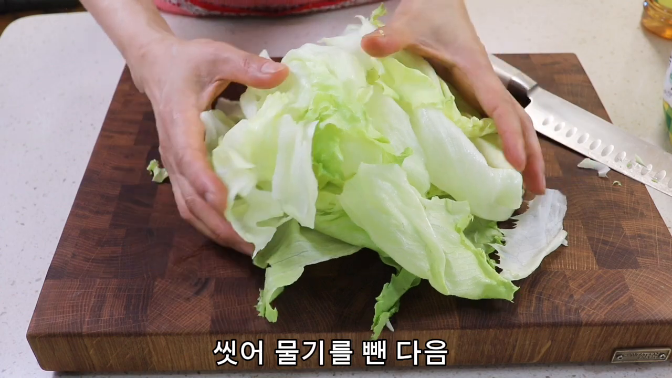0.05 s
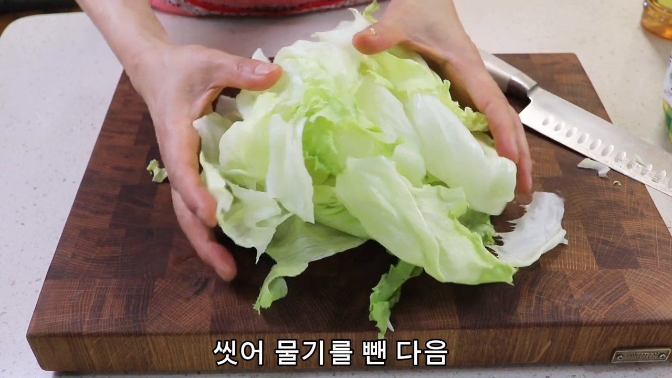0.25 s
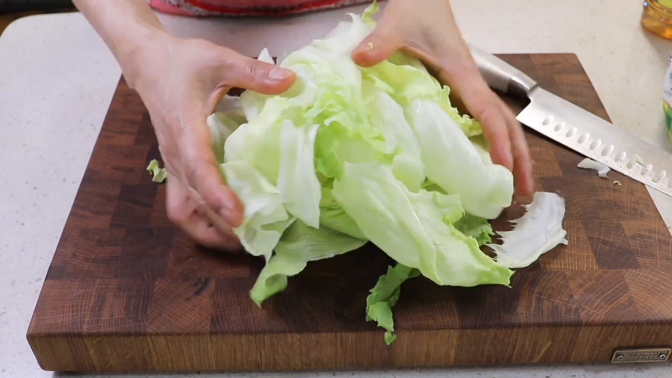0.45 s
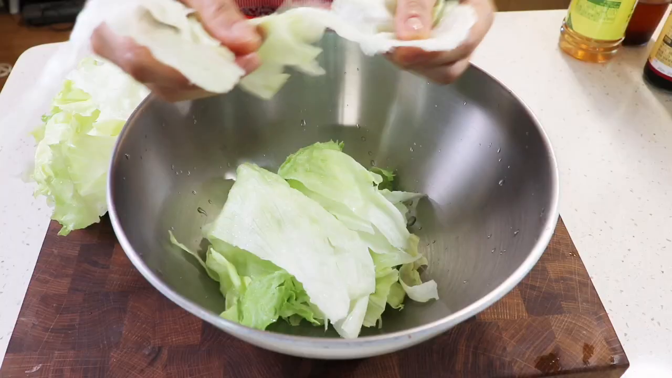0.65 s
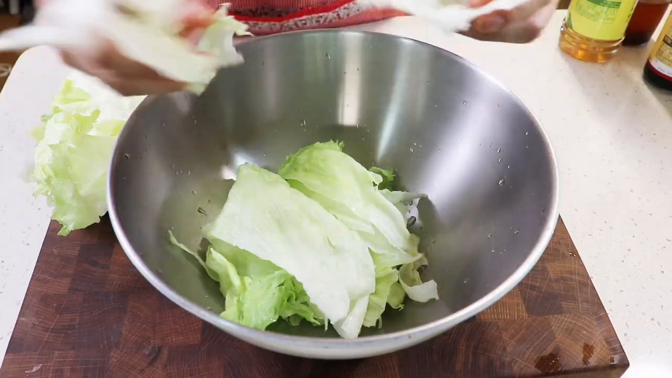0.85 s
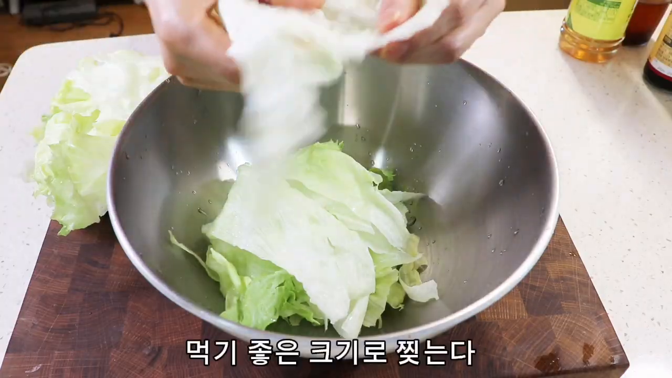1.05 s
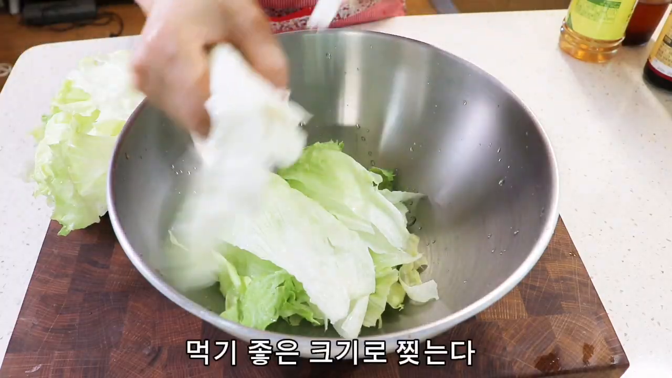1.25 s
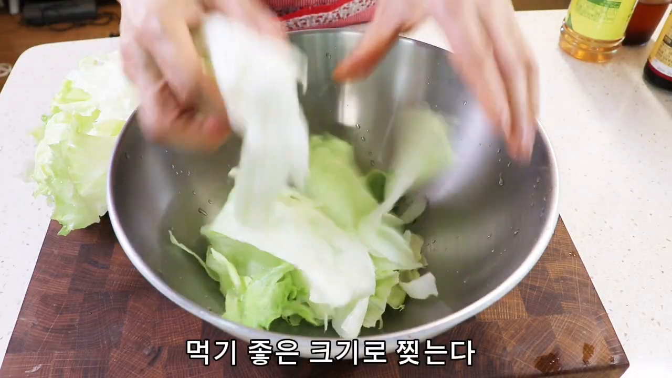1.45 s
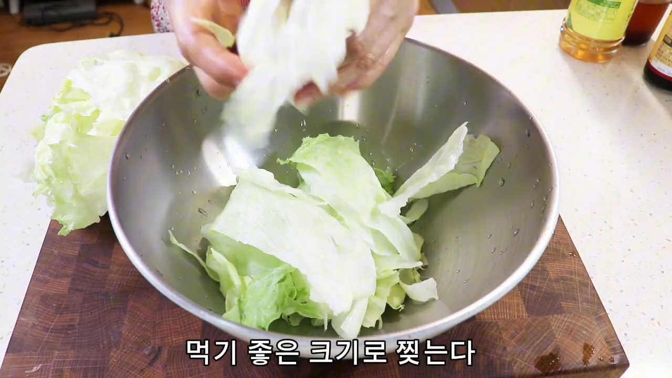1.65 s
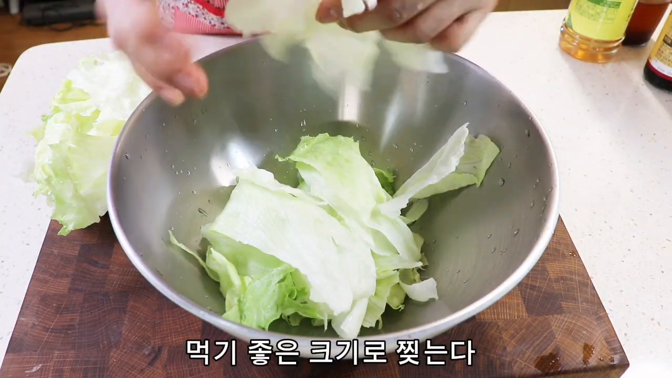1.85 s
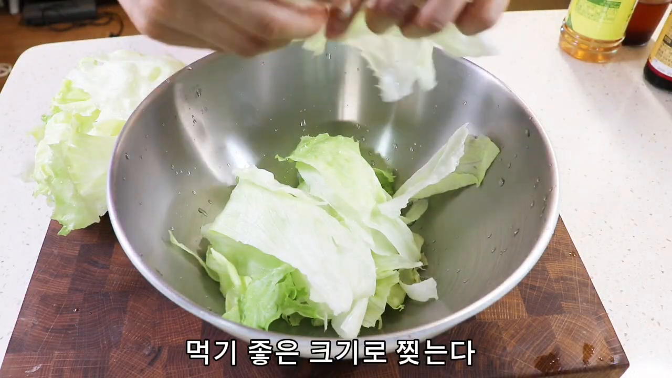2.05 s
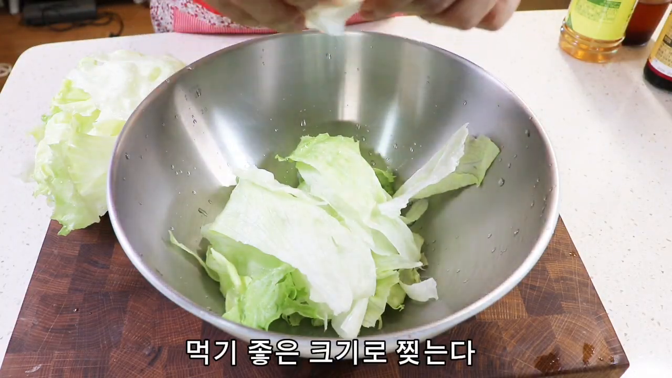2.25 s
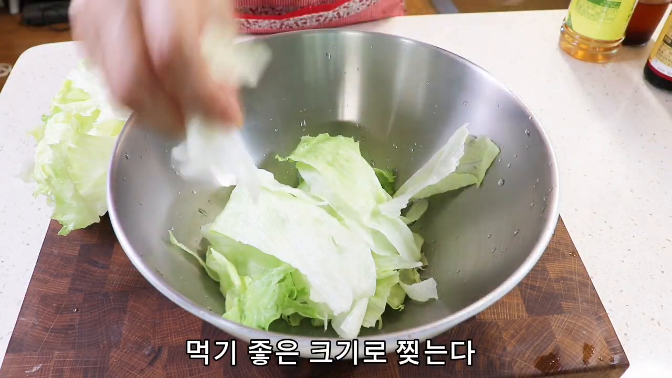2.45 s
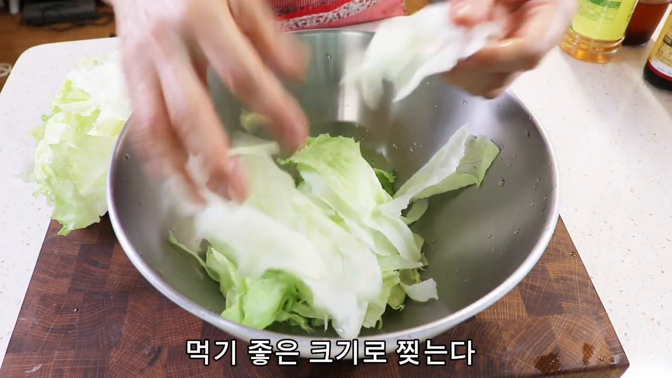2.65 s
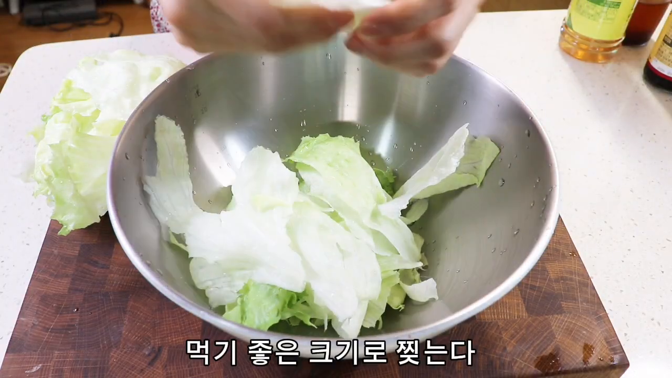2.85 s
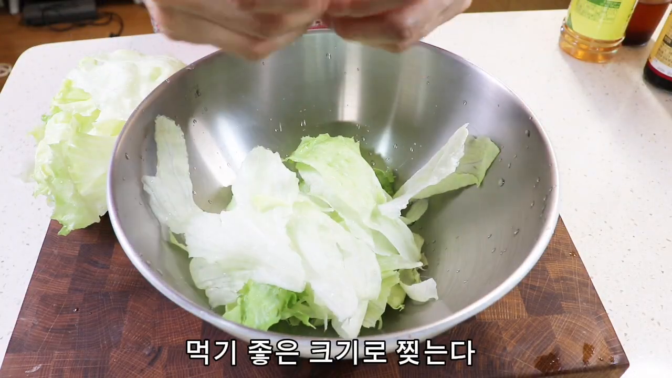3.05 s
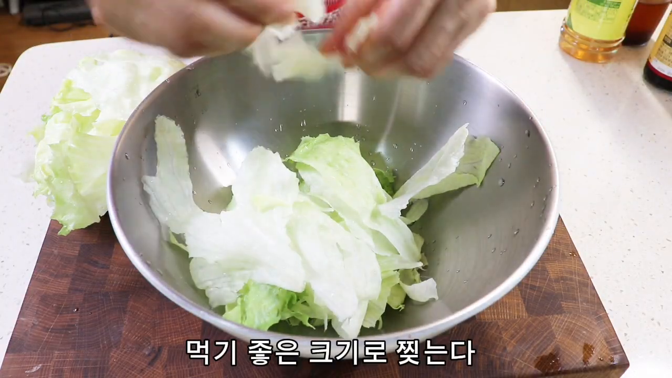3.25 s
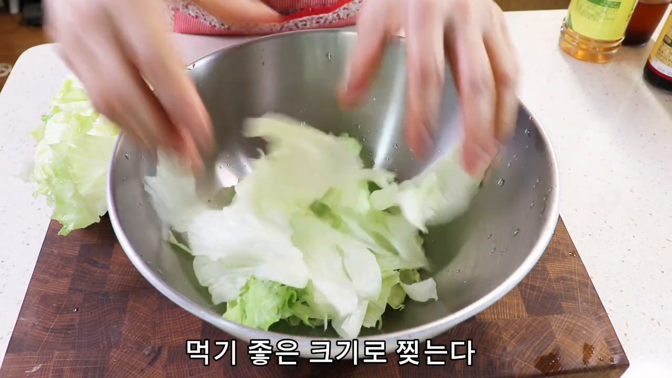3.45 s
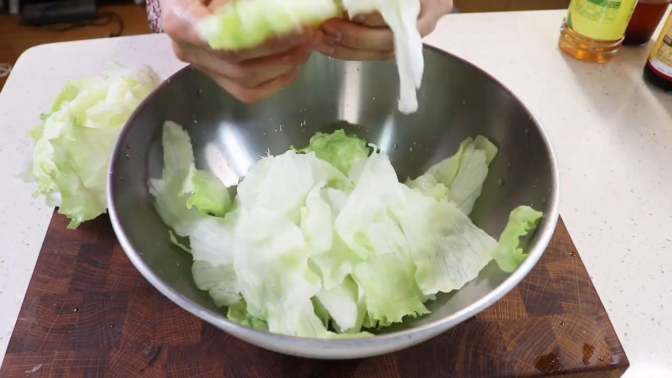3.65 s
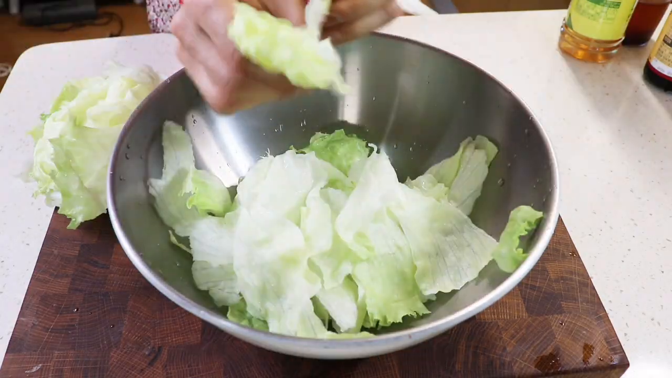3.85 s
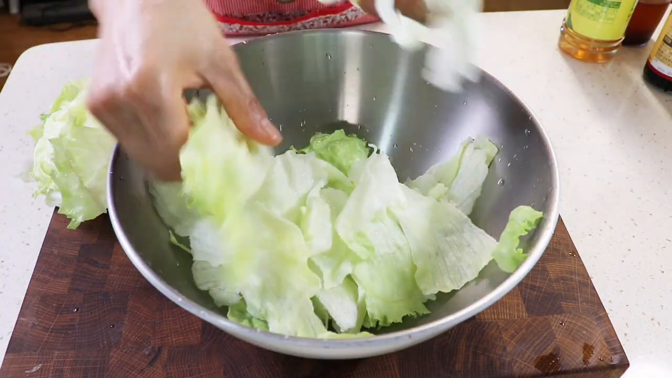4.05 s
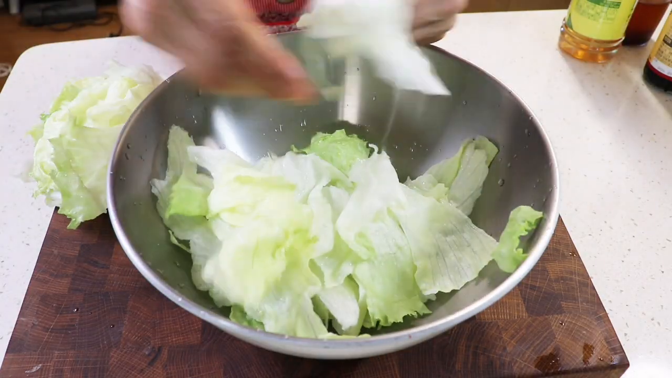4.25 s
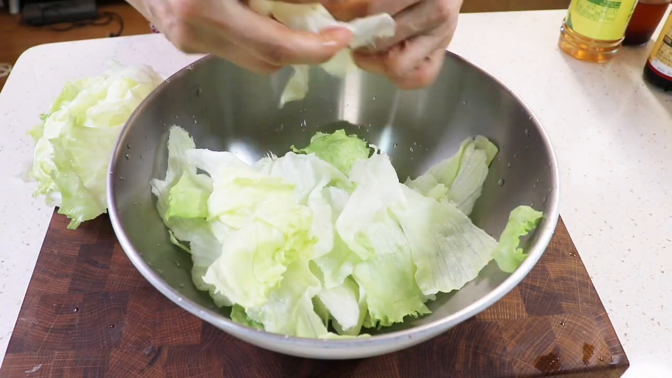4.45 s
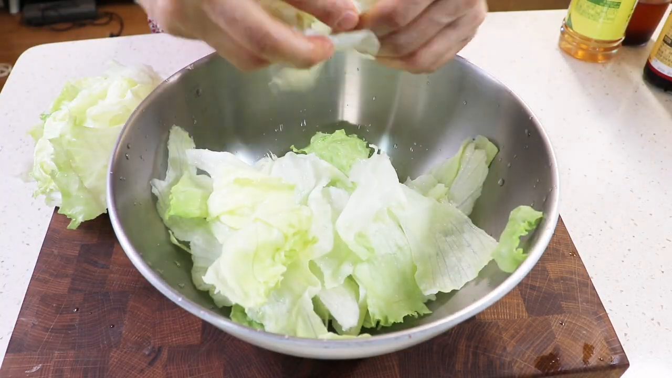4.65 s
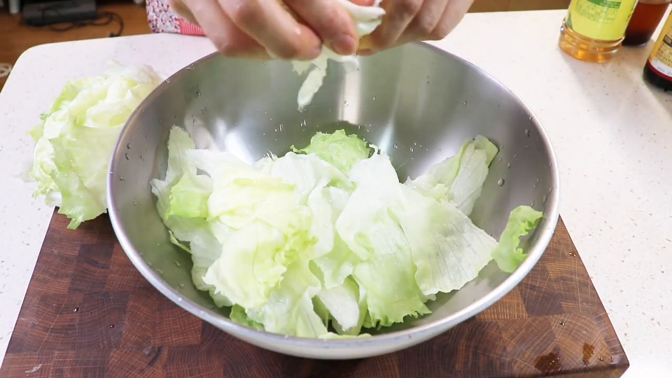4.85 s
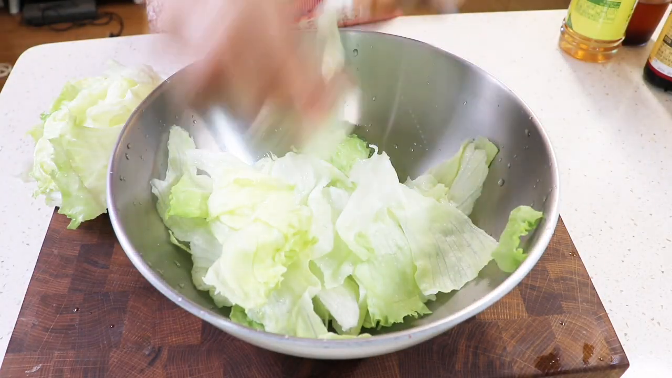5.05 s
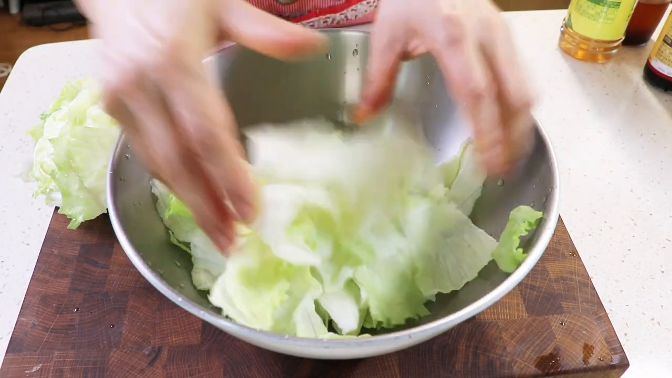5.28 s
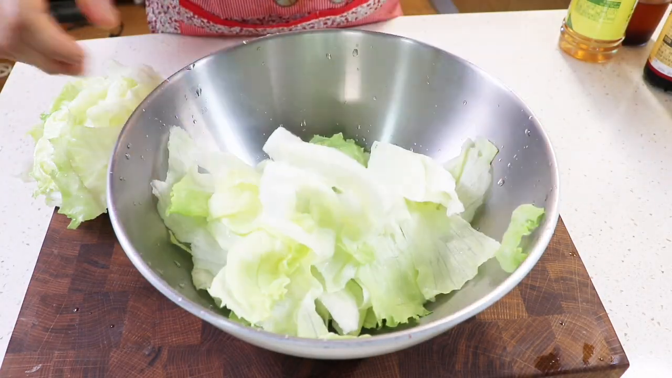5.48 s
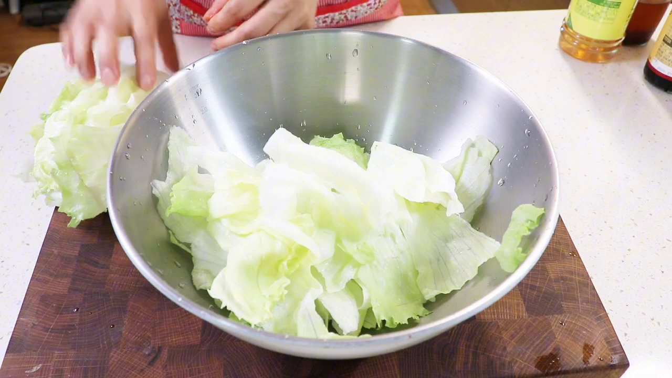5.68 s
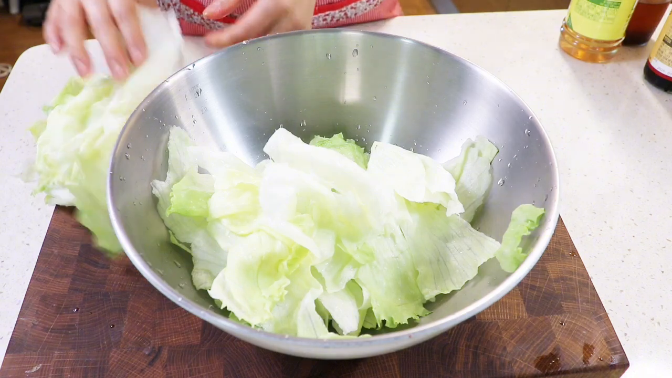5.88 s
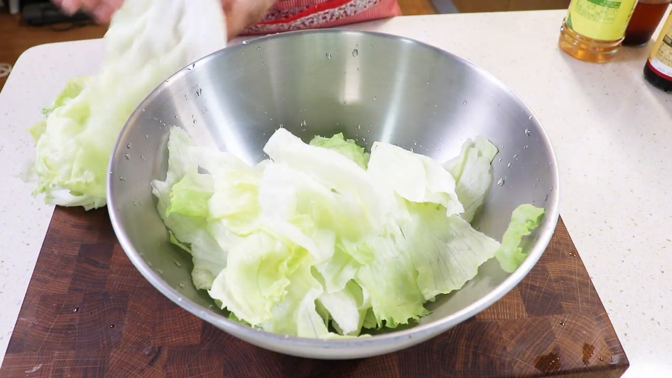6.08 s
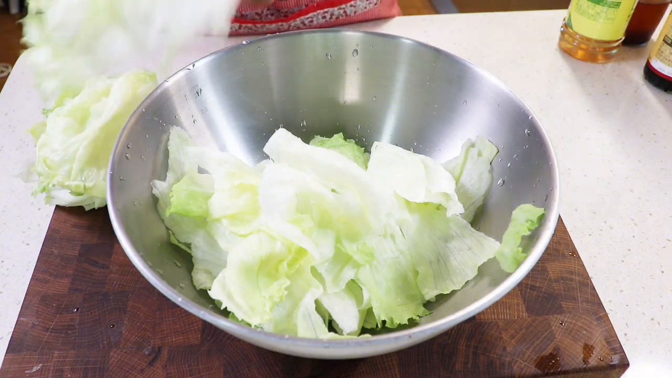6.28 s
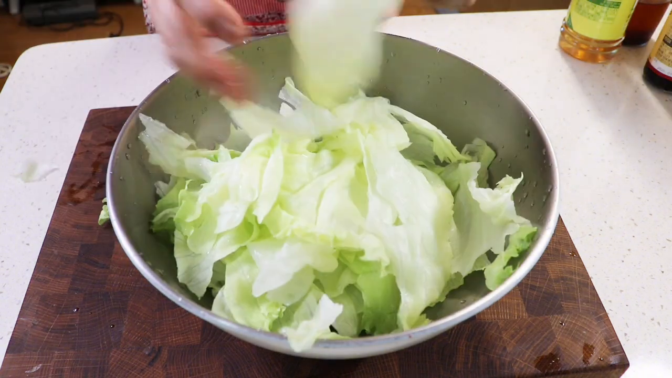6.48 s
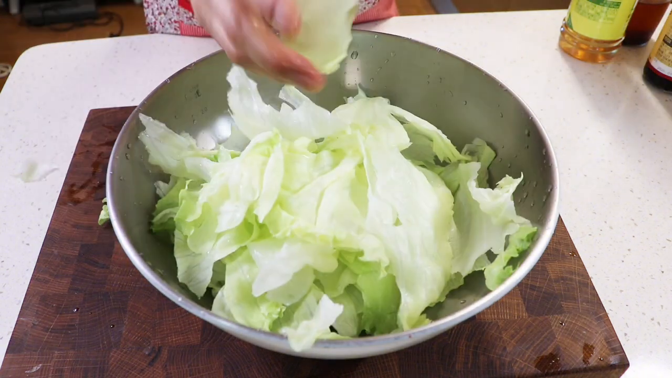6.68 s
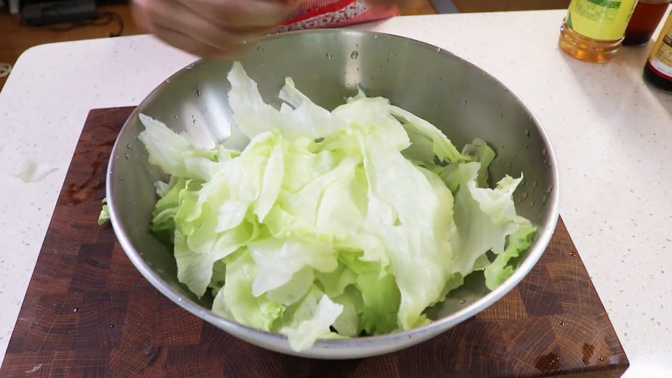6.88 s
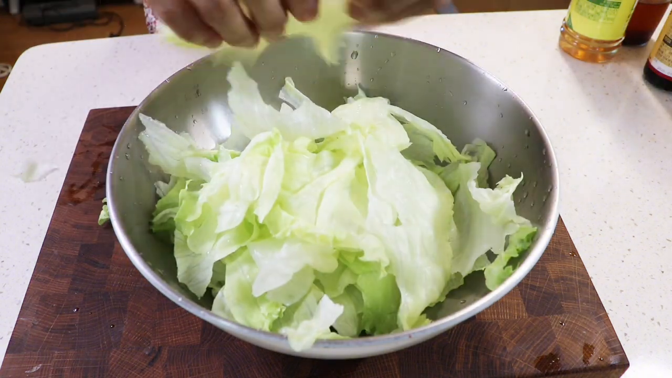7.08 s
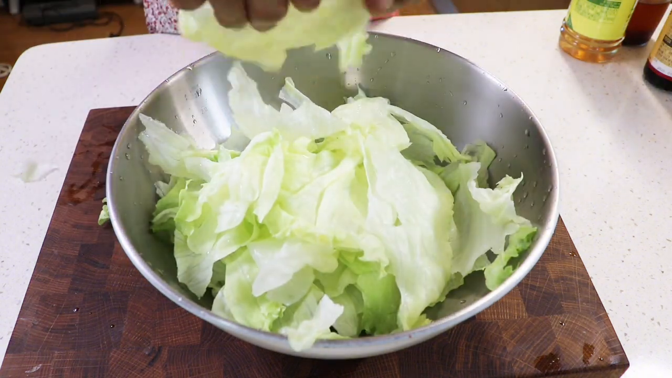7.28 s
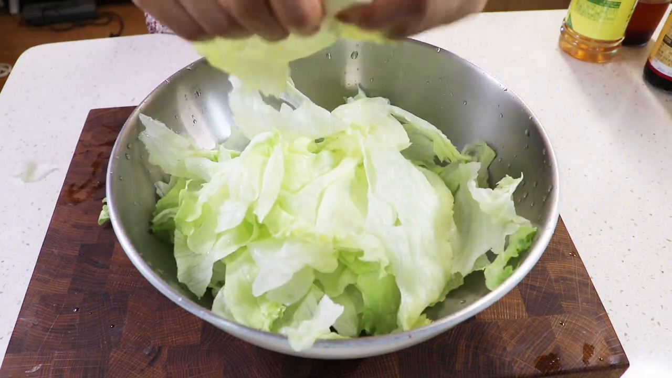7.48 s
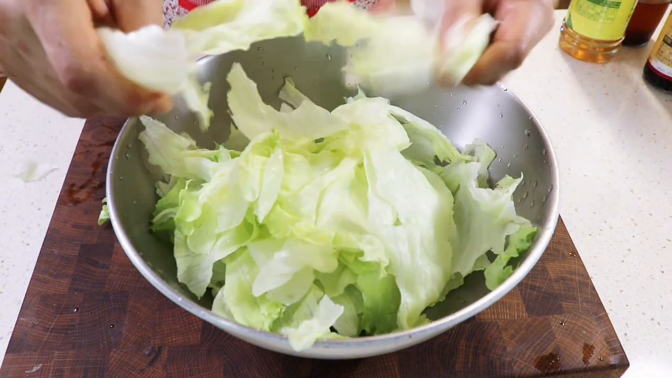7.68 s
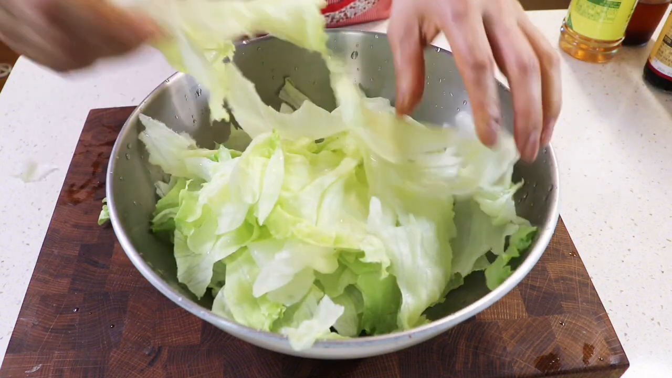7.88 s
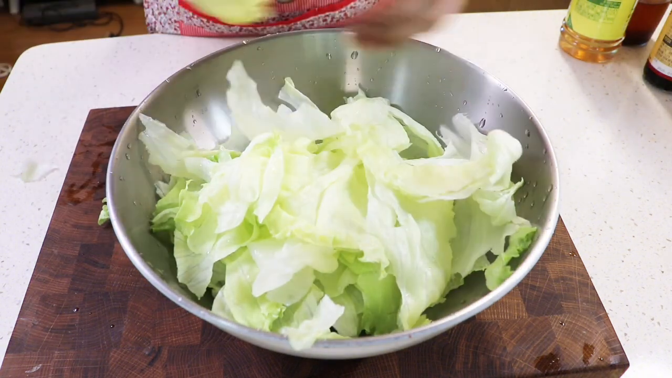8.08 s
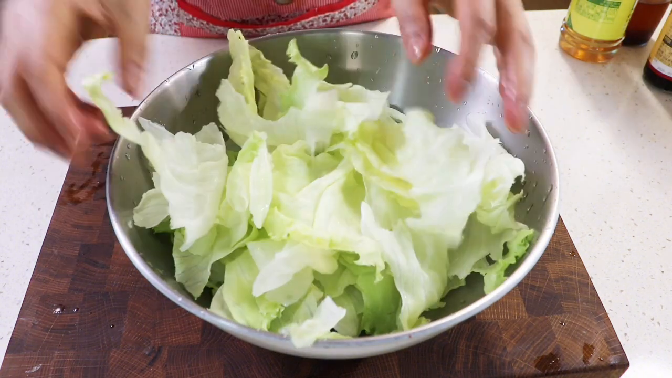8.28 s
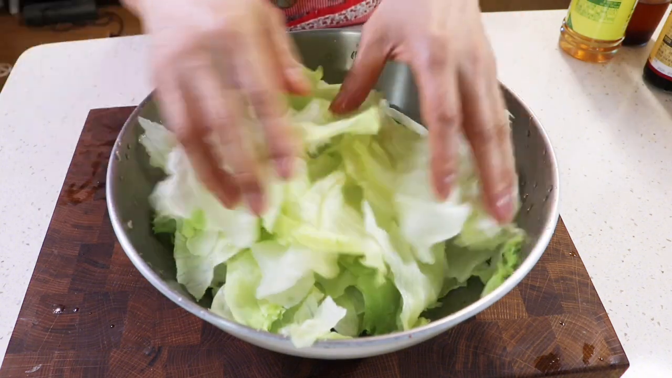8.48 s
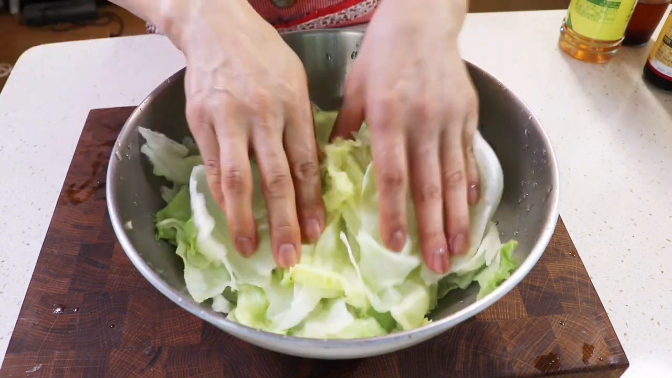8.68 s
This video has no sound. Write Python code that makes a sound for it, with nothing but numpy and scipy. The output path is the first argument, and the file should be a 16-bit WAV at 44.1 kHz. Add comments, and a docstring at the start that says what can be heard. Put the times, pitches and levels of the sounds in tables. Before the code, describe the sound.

Close, crunchy tearing of fresh lettuce in a small kitchen, brittle snaps and rustling leaves in uneven bursts, above faint rumble and hiss.

```python
"""Crisp lettuce torn by hand, close up, over a steel bowl in a small kitchen.
Tearing tissue bursts cell by cell into a dense crackle of short wavelets, and wet leaves rustle as folds give way.
Ribs snap singly, as noise bursts through a resonance; the steel bowl rings once, as a narrow band of noise.
The walls answer briefly, over a low unsteady rumble and the hiss of two microphone channels."""
import sys
import numpy as np
from scipy import signal
from scipy.fft import rfft, irfft, next_fast_len
from scipy.io import wavfile
from scipy.ndimage import uniform_filter1d, map_coordinates

SR = 44100
rng = np.random.default_rng(int(sys.argv[2]) if len(sys.argv) > 2 else 0)


def unload_audio(sound):
    """Save the sound as a 16-bit wav file, at the path given as the first command line argument."""
    columns = np.transpose(np.atleast_2d(sound))
    # keep every value between -1 and 1, then stretch to whole-number steps
    steps = np.round(np.clip(columns, -1, 1) * 32767)
    wavfile.write(sys.argv[1], SR, steps.astype(np.int16))


N = 384993


def amp(db):
    """Decibels to linear gain."""
    return 10 ** (np.asarray(db) / 20)


def unit(x):
    """Scale to an RMS of one."""
    return x / np.sqrt(np.mean(x ** 2) + 1e-20)


def along(points, hz):
    """Read (f/Hz, value) points on a log frequency axis."""
    f, v = np.transpose(points)
    return np.interp(np.log(hz + 1), np.log(f + 1), v)


def curves(rows):
    """One value per sample for each column after the time."""
    s, *cols = np.transpose(rows)
    return [np.interp(np.arange(N) / SR, s, c) for c in cols]


def wobble(rate):
    """A smooth random curve, rate knots a second."""
    knots = rng.standard_normal(int(N * rate / SR) + 4)
    return map_coordinates(knots, [np.arange(N) * rate / SR])


def filtered(x, response):
    """Shape the spectrum of x by a function of frequency."""
    m = next_fast_len(N + SR // 2)
    return irfft(rfft(x, m) * response(np.fft.rfftfreq(m, 1 / SR)), m)[..., :N]


def coloured(x, points, size=2048):
    """x through a causal minimum-phase filter with the given spectrum and unit energy."""
    gain = amp(along(points, np.fft.rfftfreq(size, 1 / SR)))
    cep = irfft(np.log(np.maximum(gain, 1e-4)))
    # fold the cepstrum forward in time, so that no sound precedes its cause
    cep = np.concatenate([cep[:1], 2 * cep[1:size // 2], np.zeros(size // 2)])
    pulse = irfft(np.exp(rfft(cep)))
    return signal.fftconvolve(x, pulse / np.linalg.norm(pulse))[:N]


def band(x, lo_hz, hi_hz):
    """Band-pass x."""
    return signal.sosfilt(signal.butter(2, [lo_hz, hi_hz], "band", fs=SR, output="sos"), x)


def laid(start, rows):
    """Sum short sounds, one a row, at their start samples."""
    at = start[:, None] + np.arange(rows.shape[1])
    return np.bincount(at.ravel(), rows.ravel(), N + rows.shape[1])[:N]


def levelled(x):
    """Even out the slow swings in level, so that the pull alone sets them."""
    return x / np.sqrt(np.abs(uniform_filter1d(x ** 2, size=5000)) + 1e-12)


# One rip of leaf a row: start t/s, hold/s, level/dB, flap/dB and flesh/dB (both against the level)
RIPS = [(0, 0.006, -27, -8.5, -1.5), (0.147, 0.0042, -23.5, -23.5, -6), (0.171, 0.11, -40.5, -2, -3),
        (0.347, 0.019, -40, 0, 6), (0.45, 0.027, -34, -13.5, -1.5), (0.521, 0.17, -39, -2.5, 2),
        (0.638, 0.0047, -22, -15.5, -26.5), (0.903, 0.017, -37.5, -26, -15), (1.121, 0.028, -29, -8, -3.5),
        (1.216, 0.017, -24.5, -6.5, -15), (1.344, 0.064, -41, -23, -7), (1.445, 0.05, -38.5, -1.5, -2.5),
        (1.697, 0.18, -39, -10.5, -14), (1.971, 0, -33, -16.5, -9), (2.112, 0, -26.5, -18.5, -19),
        (2.181, 0.053, -30.5, -16, -6.5), (2.38, 0.024, -26.5, -10, -0.5), (2.639, 0, -40, 8.5, 2),
        (2.803, 0.1, -45, -7, -26), (2.986, 0.012, -38, -11, -30), (3.076, 0, -29, -9, -14),
        (3.194, 0.042, -23, -16, -15.5), (3.445, 0.02, -35.5, -5, -6.5), (3.769, 0.21, -35.5, -17.5, -8),
        (3.841, 0.092, -29.5, -13.5, -2.5), (4.093, 0.051, -36.5, -12.5, -13),
        (4.455, 0.094, -43, -10, -10.5), (4.583, 0.0084, -37.5, -16.5, 1), (4.641, 0.22, -33.5, -18.5, 2),
        (4.816, 0.093, -33, -29, -8), (5.0, 0.053, -28, -21, -13.5), (5.19, 0.032, -38.5, -20.5, -17),
        (5.34, 0.043, -41, -6.5, -12.5), (5.751, 0, -48.5, -7, 5), (5.844, 0.084, -45, -8, -1.5),
        (6.194, 0.12, -44.5, -7, -8), (6.474, 0.12, -45.5, -5, -5), (6.708, 0.045, -47.5, -3, 1),
        (6.848, 0.18, -48.5, 0, 0), (7.12, 0.07, -37.5, -11.5, 3), (7.295, 0.14, -38, -15, 4),
        (7.362, 0.14, -32.5, -12.5, 0), (7.564, 0.02, -21, -9.5, -4), (7.632, 0.17, -44, -19, -10.5),
        (7.909, 0.0077, -42, -8, -10.5), (8.094, 0.0078, -52, 7, 20), (8.164, 0.052, -46.5, -0.5, -20),
        (8.479, 0.008, -32, -11, -20), (8.558, 0.025, -28, -6.5, -17), (8.641, 0.039, -22.5, -8.5, -4.5)]
# Leaves shifting in the hands, beneath the rips: t/s, level/dB
HANDLING = [(0, -38.5), (.7, -51), (2.9, -50), (3.45, -43), (3.665, -67), (3.68, -48), (4.4, -48.5),
            (5.4, -47.5), (5.52, -69), (5.72, -72), (5.95, -50.5), (6.4, -56.5), (7.7, -46), (8.35, -58),
            (8.73, -34.5)]
HANDLING_FLAP_DB, HANDLING_FLESH_DB = -11, -8
RISE_DB_PER_S, FALL_DB_PER_S = 901.5, 318  # a rip builds up fast, holds, and dies away


def pull():
    """Rips and handling add in power; the louder a leaf at each moment, the more it sets the colour."""
    t = np.arange(0, N / SR, 1 / 500)
    s, hold, db, flap_db, flesh_db = np.transpose(RIPS)[:, :, None]
    rise_db = RISE_DB_PER_S * np.maximum(s - t, 0)
    fall_db = FALL_DB_PER_S * np.maximum(t - s - np.abs(hold), 0)
    rips = amp(db - rise_db - fall_db) ** 2
    hands = amp(np.interp(t, *np.transpose(HANDLING))) ** 2
    total = hands + rips.sum(axis=0)

    def blend(rip_db, hands_db):
        return ((rips * rip_db).sum(axis=0) + hands * hands_db) / total

    flap = blend(flap_db, HANDLING_FLAP_DB)
    flesh = blend(flesh_db, HANDLING_FLESH_DB)
    return curves(np.transpose([t, 10 * np.log10(total), flap, flesh]))


def bursts(centre_hz, spread, cycles, spike_db, clump, count):
    """Bursting cells: damped wavelets of scattered pitch and size, arriving in clumps."""
    density = np.cumsum(np.exp(clump * wobble(70)))
    when, pitch, size = rng.random(count), rng.standard_normal(count), rng.exponential(size=count)
    hz = np.clip(centre_hz * np.exp(spread * pitch), 1300, 16000)[:, None]
    t = np.arange(128) / SR
    strength = amp(spike_db * np.minimum(size, 4))[:, None] * np.sqrt(hz)
    wavelets = strength * np.sin(2 * np.pi * hz * t) * np.exp(-t * hz / cycles)
    x = laid(np.searchsorted(density, when * density[-1]).clip(0, N - 1), wavelets)
    # even spectrum, so that the leaf alone sets the colour
    smooth = uniform_filter1d(np.abs(rfft(x)) ** 2, size=4000)
    return levelled(irfft(rfft(x) / np.sqrt(smooth + 1e-9), N))


def creases(t60, spread_db, count):
    """Envelope of folds that give way suddenly and settle within a few hundredths of a second."""
    t = np.arange(2000) / SR
    folds = amp(spread_db * rng.standard_normal((count, 1)) - 60 * t / t60)
    x = .5 + laid(rng.integers(0, N, size=count), folds)
    return x / np.sqrt(np.abs(uniform_filter1d(x ** 2, size=5000)))


def patchy(x, depth_db, size):
    """Random gain in patches of time and frequency: every scrap of leaf has its own colour."""
    z = signal.stft(x, nperseg=size)[2]
    field = uniform_filter1d(rng.standard_normal(z.shape), size=5, axis=0)
    field = uniform_filter1d(field, size=6, axis=1)
    return signal.istft(z * amp(depth_db * unit(field)), nperseg=size)[1][:N]


# Colour of the leaf through the microphone, here and in the snaps: f/Hz, level/dB (per Hz, relative)
LEAF = [(88, -61), (150, -3), (330, -14), (640, -11.5), (900, -11.5), (1810, -6.5), (2070, -4.5),
        (2670, -6), (3790, -3), (4520, -9), (6410, -2), (12400, -16), (15700, -22)]
# Treble at a middling pull, which also shades the snaps: t/s, level/dB
TREBLE = [(.5, -7), (1.2, -8.5), (1.7, -6), (2.4, -4.5), (3, -5), (5, -4), (7.3, -7.5), (8.6, -5.5)]
CRISP_PER_DB = 0.16  # treble gained (dB) for each dB of harder pull


def tearing():
    """The pull drives crackle and rustle; thick or broad leaves sound lower, hard pulls crisper."""
    pull_db, flap_db, flesh_db = pull()
    cells = bursts(centre_hz=3720, spread=0.674, cycles=1.5, spike_db=2.0, clump=1.3, count=9000)
    scraps = patchy(rng.standard_normal(N), depth_db=2.0, size=256)
    scraps = patchy(scraps, depth_db=3.5, size=1024)
    rustle = creases(t60=0.1, spread_db=-2.5, count=500) * scraps
    skin = coloured(cells + amp(1.5) * unit(rustle), LEAF)

    def part(db, lo_hz, hi_hz):
        return amp(db) * unit(band(skin, lo_hz, hi_hz))

    treble_db = curves(TREBLE)[0] + CRISP_PER_DB * (pull_db + 33.5)
    # neighbouring bands alternate in sign to join without a gap
    low = part(flap_db, 365, 1230) - part(flesh_db, 1360, 2980)
    high = part(0, 3190, 5210) - part(treble_db, 8330, 16700)
    return amp(pull_db) * (low + high)


# Background level, changing slowly but for a sudden step down at 3.67 s: t/s, level/dB (relative)
ROOM = [(0, -64.5), (3.66, -64), (3.68, -73.5), (6.9, -68.5), (7.6, -70), (8.73, -64.5)]
# Spectrum of the rumble: f/Hz, level/dB (per Hz, relative)
RUMBLE = [(12, -28), (20, -8.5), (125, -8), (1200, -19), (1560, -23), (2640, -120)]
# Spectrum of the hiss: f/Hz, level/dB (per Hz, relative)
HISS = [(180, -41.5), (300, -5.5), (956, -3.5), (4170, -3), (15700, -13)]


def background():
    """A nearly shared, unsteady rumble, and a partly shared hiss that follows the same room level."""
    room_db, = curves(ROOM)

    def shaded_noise(points):
        return filtered(rng.standard_normal((2, N)), lambda hz: amp(along(points, hz)))

    mid, side = shaded_noise(RUMBLE)
    rumble = unit(np.array([mid + side / 6, mid - side / 6]))
    shared, own = shaded_noise(HISS)
    hiss = unit(np.array([shared + .5 * own, shared - .5 * own]))
    rumble_db = room_db + 10.0 + 2.3 * wobble(7.6)
    hiss_db = 1.59 * (room_db + 70.5) - 67.5  # 1.59 dB for each dB of room level
    return amp(rumble_db) * rumble + amp(hiss_db) * hiss


# Decay of the walls' answer: f/Hz, t60/s
WALLS = [(300, 0.086), (14000, 0.16)]


def kitchen(x):
    """The walls answer with a noise tail in which each frequency dies at its own speed."""
    hz, t, z = signal.stft(rng.standard_normal(SR // 2), SR, nperseg=256)
    decay = amp(-60 * t / along(WALLS, hz)[:, None])
    tail = signal.istft(z * decay, SR, nperseg=256)[1]
    delayed = np.pad(x, (150, 0))  # samples before the first reflection
    return signal.fftconvolve(delayed, tail / np.linalg.norm(tail))[:N]


# One snapping rib a row, except the row at 1.53 s, the click of a fingernail on the steel bowl: t/s, level/dB
# (relative), pitch f/Hz
SNAPS = [(0.0145, -9, 3800), (0.034, -11, 3800), (0.1461, -0.5, 3950), (0.1641, -11, 3870),
         (0.1827, -7.5, 3790), (0.249, -15, 3670), (0.3059, -6, 3730), (0.4219, -24, 7500),
         (0.4478, -18, 3900), (0.631, -13, 3730), (0.7188, -5, 4840), (0.9505, -14, 3620),
         (1.0285, -18, 3600), (1.144, -9.5, 3850), (1.2151, -2.5, 3580), (1.2239, -1.5, 3690),
         (1.2467, -4.5, 3900), (1.5294, -5, 6230), (1.858, -11.5, 3840), (1.973, -12, 3830),
         (2.1061, -25, 7000), (2.119, -3.5, 3960), (2.1294, -6, 3330), (2.139, -1, 3760), (2.166, -6, 4400),
         (2.1814, -4, 3830), (2.186, -1.5, 3950), (2.3302, -27, 7500), (2.3436, -11.5, 5660),
         (2.382, -3, 3860), (2.398, -3.5, 5700), (2.6298, -18, 2000), (2.717, -22, 1700),
         (2.8065, -20, 3850), (2.8654, -15, 3670), (2.966, -16, 4100), (2.996, -18, 3780),
         (3.0359, -12, 3670), (3.1428, -19.5, 3960), (3.1643, -16, 7000), (3.1979, -3, 3740),
         (3.336, -15, 3640), (3.7579, -11, 2350), (3.7825, -14.5, 2920), (3.8222, -8.5, 3040),
         (3.8414, -7, 2520), (3.8611, -7.5, 3530), (3.926, -8, 3560), (4.586, -17.5, 4200),
         (4.6053, -5, 3820), (4.623, -12.5, 3700), (4.675, -1, 2820), (4.7432, -0.5, 3340),
         (4.7906, -9.5, 3950), (4.8324, -7.5, 2540), (4.8508, -6, 2870), (4.8812, -10.5, 3620),
         (4.9013, -12, 4070), (4.9464, -5, 4050), (4.9725, -10, 4000), (5.004, -10.5, 3470),
         (5.0172, -13, 3390), (5.021, -14, 3500), (5.0435, -7, 3910), (5.0736, -3, 3580),
         (5.1923, -14.5, 3520), (5.7371, -24.5, 2860), (6.2255, -19, 1870), (6.2908, -16.5, 2950),
         (7.108, -18, 3670), (7.1758, -3, 3110), (7.2459, -7.5, 3800), (7.2642, -14, 3970),
         (7.3226, -7.5, 3850), (7.3747, -2.5, 4070), (7.3832, -3.5, 2960), (7.4618, -14, 4800),
         (7.4881, -7.5, 4070), (7.5237, -11.5, 3020), (7.5515, -14, 3580), (7.7258, -16.5, 4100),
         (8.168, -19, 1490), (8.2472, -12, 3400), (8.4068, -22.5, 3440), (8.51, -14.5, 4100),
         (8.647, -5.5, 3540), (8.713, -3, 4300)]


def snaps():
    """Each rib cracks, then splinters on around its pitch; thin ribs and hard breaks are brighter,
    broad leaves add a thud."""
    s, db, hz = np.transpose(SNAPS)[:, :, None]
    t = np.arange(1536) / SR
    f = np.fft.rfftfreq(len(t), 1 / SR)
    count = len(s)
    start = np.round(s[:, 0] * SR).astype(int)
    noise = rng.standard_normal((count, len(t)))

    # some ribs part at once, others give way
    giving = 1 - np.exp(-t / (0.00087 * rng.random((count, 1)) + 1 / SR))
    # the rib splits for a few ms, then stops short
    split_s = 0.0014 + 0.0022 * rng.random((count, 1))
    crack = 0.33 * np.exp(-(t / split_s) ** 2) * giving * noise
    # the first break: a dull give or a needle-sharp click
    crack[:, 0] += 3 * rng.random(count) ** 2 + .5
    splinters = 0.15 * amp(-60 * t / 0.039) * giving * noise
    blow = crack + splinters

    width = 0.22 * hz
    resonance = 1j * f * width / (hz ** 2 - f ** 2 + 1j * f * width)
    rib = irfft(rfft(blow) * (0.77 + 1.8 * resonance))
    size = np.linalg.norm(rib, axis=1, keepdims=True)
    rib, blow = rib / size, blow / size

    # the hollow that the bent leaf forms
    cup = 720 * np.exp(0.25 * rng.standard_normal((count, 1)))
    hollow = f * cup / (cup ** 2 - f ** 2 + .5j * f * cup)
    thud = irfft(rfft(amp(-60 * t / 0.02) * noise) * hollow)
    thud_db = pull()[1][start, None] + 3
    sparkle_db = 15.0 + .2 * db + curves(TREBLE)[0][start, None] + 11.0 * np.log2(hz / 3700)

    def part(level_db, rows, lo_hz, hi_hz):
        return band(coloured(laid(start, amp(db + level_db) * rows), LEAF), lo_hz, hi_hz)

    body = part(10.43, rib, 1320, 5420)
    return body - part(thud_db, thud, 280, 1250) - part(sparkle_db, blow, 7730, 15000)


# A fingernail touches the steel: t/s, level/dB, t60/s
TAP = (1.53, -18, 0.1)
# The crowded modes that answer: low f/Hz, high f/Hz
BOWL_MODES = (5900, 6700)


def bowl():
    """The leaves damp the steel fast: a rough, narrow ring of band-limited noise."""
    s, db, t60 = TAP
    t = np.arange(N) / SR - s
    noise = filtered(rng.standard_normal(N), lambda hz: hz > BOWL_MODES[0])
    ring = unit(band(noise, *BOWL_MODES))
    return (t > 0) * amp(db - 60 * np.abs(t) / t60) * ring


def scene():
    """Lettuce and bowl up close, the kitchen's answer behind them, rumble and hiss beneath."""
    near = tearing() + snaps() + bowl()
    return near + amp(-12.0) * kitchen(near) + background()


TOP_HZ = 15900  # band limit


def record(dry):
    """Peaks clip at full scale; nothing is kept above the band limit."""
    return filtered(np.clip(dry, -1, 1), lambda hz: hz < TOP_HZ)


dry = scene()
out = record(dry)
unload_audio(out)
```